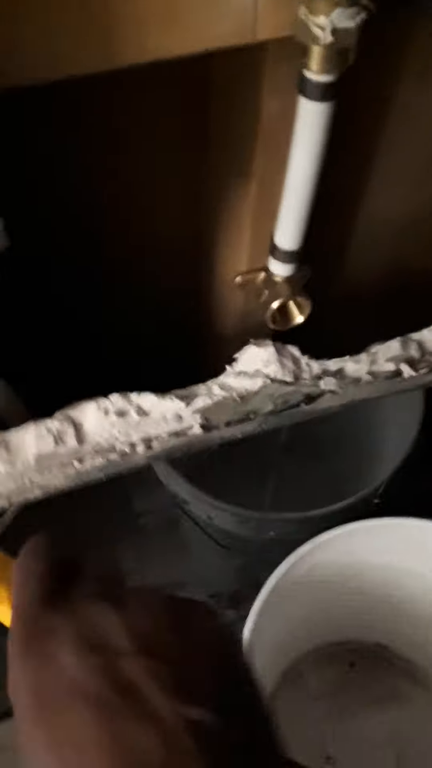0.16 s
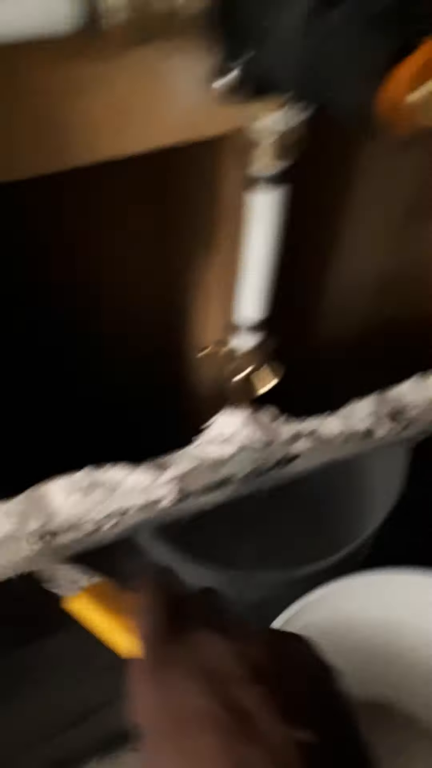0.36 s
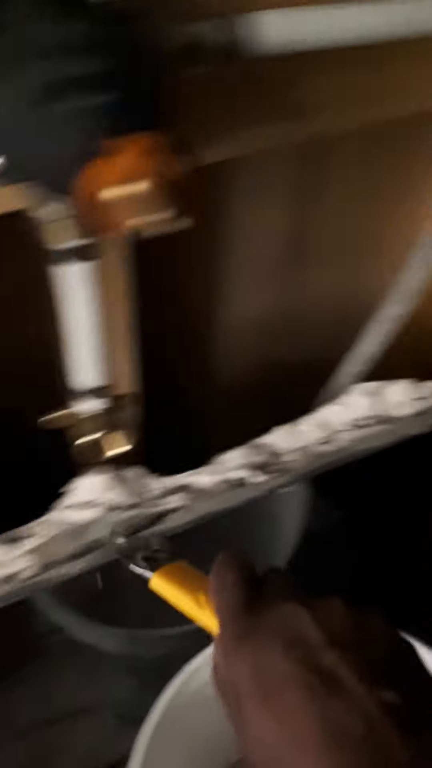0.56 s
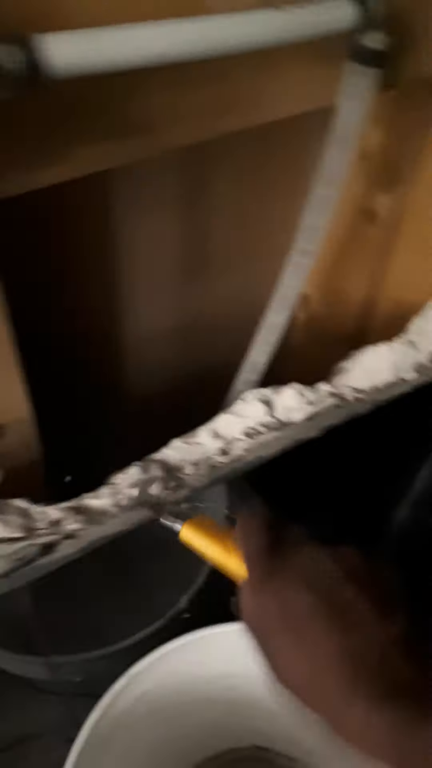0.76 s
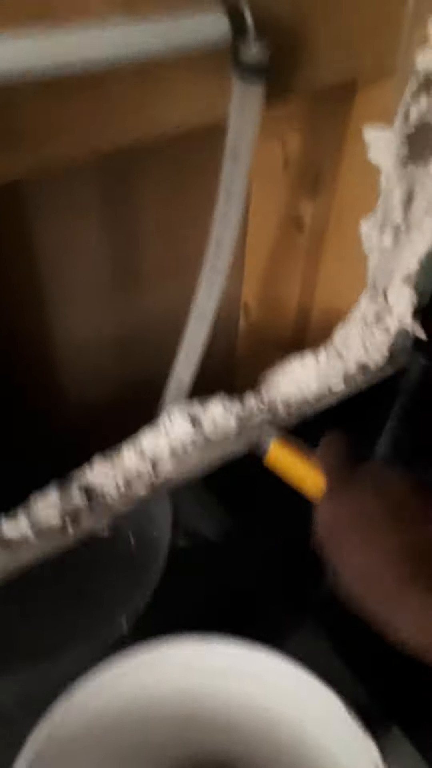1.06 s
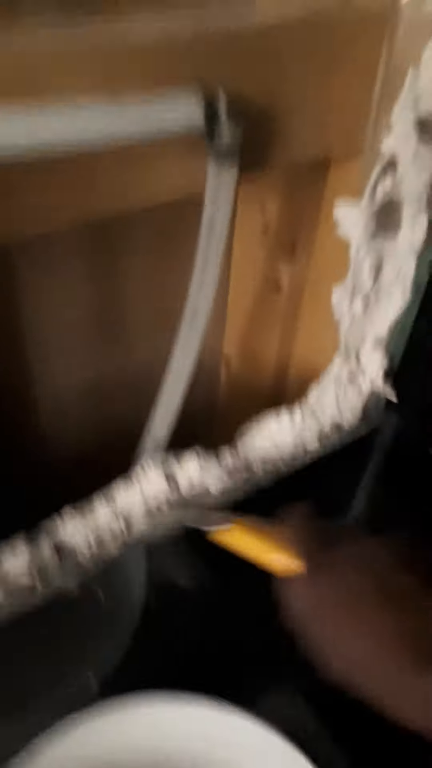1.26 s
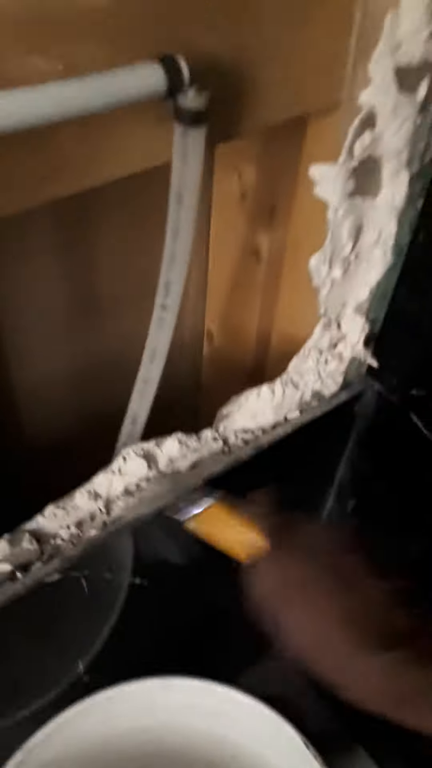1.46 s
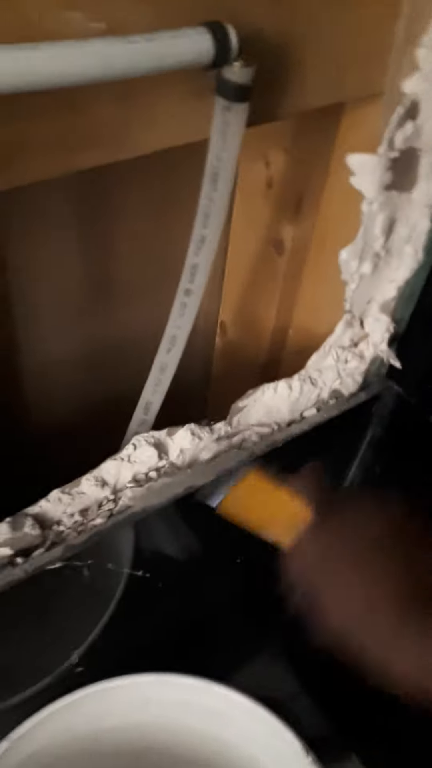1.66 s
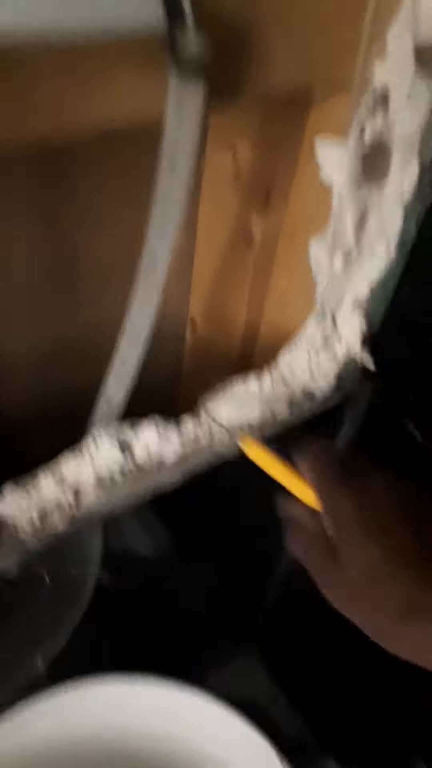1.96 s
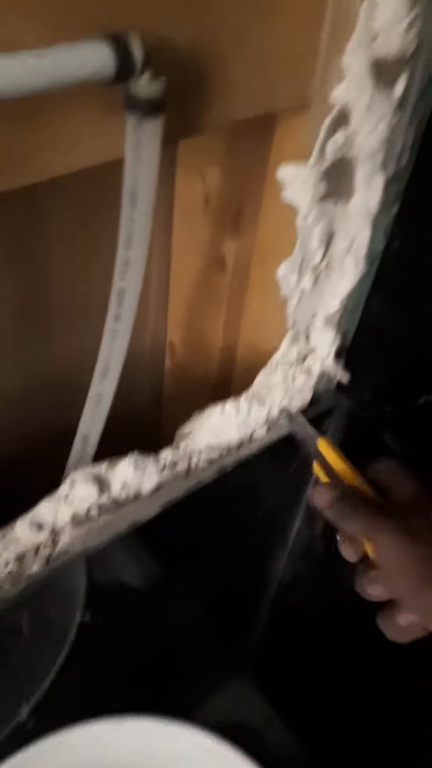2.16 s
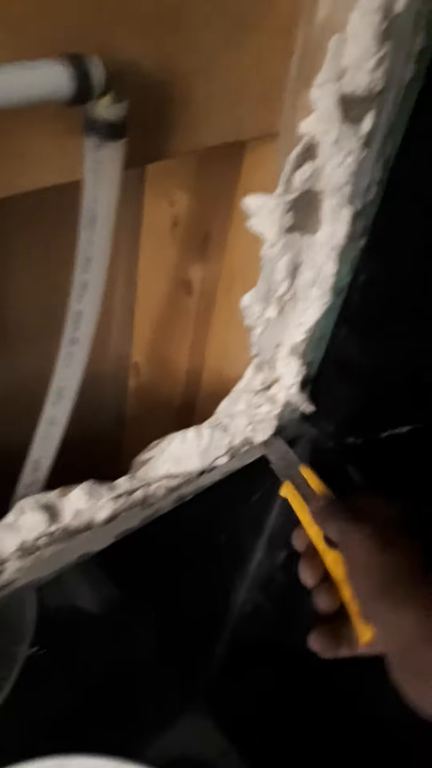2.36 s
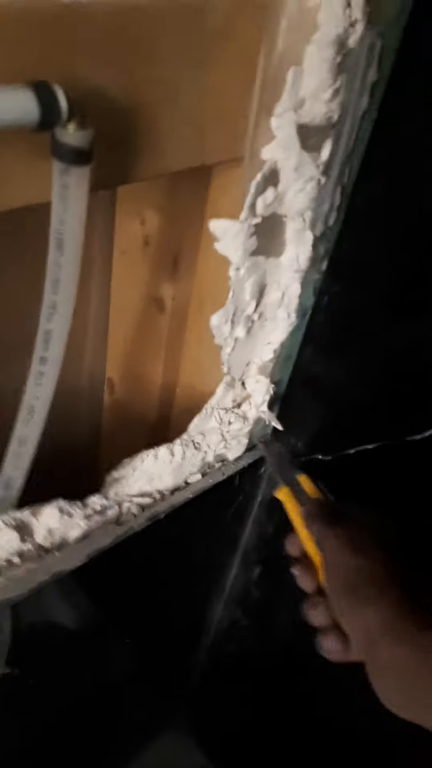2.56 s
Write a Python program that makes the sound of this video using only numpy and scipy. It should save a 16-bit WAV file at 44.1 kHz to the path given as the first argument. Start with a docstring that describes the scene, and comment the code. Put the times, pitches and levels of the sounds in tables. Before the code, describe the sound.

A knife blade scrapes crumbly mortar off a hollow wall edge in quick, gritty, uneven strokes.

```python
"""A utility knife scrapes crumbly mortar off the edge of a tiled wall opening, in a small hard room. The scene
opens on the faint, fading end of a stroke; then come a long stroke, a short jab and a dropping chip, then a
deep and a light stroke. Last, the blade chatters, brushes the edge and works at a corner, where a second,
softer chip drops. One stream of random clicks drives the rasp, the fizz of sand, the crunch and the drumming of
the hollow wall. Extra filtered clicks and bursts make landings, snags and crumbs; wavering tones make the
squeaks and groans."""
import sys
import numpy as np
from scipy import signal
from scipy.fft import rfft, irfft
from scipy.io import wavfile
from scipy.ndimage import uniform_filter1d

SR = 44100
rng = np.random.default_rng(int(sys.argv[2]) if len(sys.argv) > 2 else 0)


def materialize(psi):
    """Save the field psi as 16-bit PCM at rate SR to the path in sys.argv[1].

    A 1-D psi becomes a single channel; in a 2-D psi each row is a channel.
    """
    bounded = np.clip(np.atleast_2d(psi).T, -1, 1)
    quanta = np.round(bounded * 32767).astype(np.int16)
    wavfile.write(sys.argv[1], SR, quanta)


N = 119070
TIME_S = np.arange(N) / SR

# Tone of the drumming wall. Each row: frequency in Hz, relative level in dB.
DRUM_TONE = [(25, -55), (55, -16.5), (75, -9.5), (98, -3), (128, 5), (163, -13), (185, -9), (220, -9.5),
             (280, -16), (600, -56)]
# Tone of a breaking grain or crumb. Each row: frequency in Hz, relative level in dB.
GRAIN_TONE = [(200, -12), (700, -5.5), (1800, 1.5), (4000, 0.5), (5000, -4), (7500, -1.5), (9000, -18.5),
              (11000, -9.5), (15500, -0.5)]

HIT_WET_DB, DEBRIS_WET_DB = -2, -12.5  # how strongly contacts and debris feed the room


def amp(db):
    """Turns decibels into a gain."""
    return 10 ** (np.asarray(db) / 20)


def unit(x):
    """Scales a signal to an rms level of 1."""
    return x / np.sqrt(np.mean(x ** 2) + 1e-20)


def read(points, hz):
    """Reads a table of frequencies and values, with straight lines between points on a log-frequency axis."""
    table_hz, value = np.transpose(points)
    return np.interp(np.log(hz + 1), np.log(table_hz + 1), value)


def convolve(x, response):
    """Lets every sample of x set off the response, and keeps the length of the scene."""
    return signal.fftconvolve(np.atleast_2d(x), np.atleast_2d(response), axes=1)[:, :N]


def colour(x, points, size=4096):
    """Gives x the tone in the table, with a filter of unit energy that responds only after its input."""
    hz = abs(np.fft.fftfreq(size, 1 / SR))
    log_gain = np.log(amp(read(points, hz)))
    # The Hilbert transform supplies the phase that puts the response as early as possible
    spectrum = np.exp(np.conj(signal.hilbert(log_gain)))
    response = np.fft.ifft(spectrum).real[:size // 2]
    return convolve(x, response / np.linalg.norm(response))[0]


def high_pass(x, hz, order=2):
    """Weakens what lies under hz."""
    return signal.sosfilt(signal.butter(order, hz, "high", fs=SR, output="sos"), x)


def impulses(rows):
    """Makes one click for each pair of time in seconds and level in dB."""
    return sum(amp(db) * (np.arange(N) == round(start * SR)) for start, db in rows)


def gate(start, end):
    """Opens during a contact: a quick rise, a hold and a short release."""
    rise_s, release_s = 0.0007, 0.0019
    rise = np.clip((TIME_S - start) / rise_s, 0, 1)
    return rise * np.exp(-np.maximum(TIME_S - end, 0) / release_s)


def burst(start, length, db):
    """Shapes a brief contact that weakens as it lasts."""
    sag_db = -5.5  # change over one length
    progress = np.clip((TIME_S - start) / length, 0, 2)
    return gate(start, start + length) * amp(db + sag_db * progress)


def send(x, wet_db):
    """Pairs a sound with its feed to the room."""
    return np.array([x, x * amp(wet_db)])


def ringing(x, modes):
    """Lets x strike a body whose resonances each fade at their own pace."""
    t = TIME_S[:SR // 2]
    response = sum(amp(db - 60 * t / t60) * np.cos(2 * np.pi * hz * t) for hz, db, t60 in modes)
    return convolve(x, response)[0]


def wall(x):
    """Adds the ring of the hollow wall to the sound that drives it."""
    # Resonances of the wall. Each row: frequency in Hz, relative level in dB, seconds to fade by 60 dB.
    wall_modes = [(129.4, -5, 0.069), (181, -1, 0.36), (219, -6, 0.15), (330, -0.5, 0.3), (442, 4, 0.18),
                  (611, 4.5, 0.19), (653, -11.5, .16)]
    ring_gain = amp(-51) / 2
    return x + ring_gain * ringing(x, wall_modes)


def background_air():
    """Makes a faint steady hiss and hum of the air from filtered noise, separate for left and right."""
    # Tone of the air. Each row: frequency in Hz, relative level in dB.
    air_tone = [(25, 1), (60, 8.5), (130, 6), (300, -10), (1200, -19.5), (2100, -1), (3000, -21.5),
                (7000, -17), (10000, -22.5), (16000, -14)]
    level_db = -63
    return amp(level_db) * np.array([colour(rng.standard_normal(N), air_tone) for _ in range(2)])


def room(x, size=256):
    """Adds close reflections from the tiles to dry sound x[0], and a fading tail of the room to feed x[1]."""
    # Fading of the tail. Each row: frequency in Hz, seconds to fade by 60 dB.
    fade_times = [(100, 0.16), (260, 0.43), (700, 0.28), (1600, 0.34), (2150, 0.38), (2800, 0.27),
                  (4850, 0.3), (12800, 0.22)]
    # Likeness of the two sides. Each row: frequency in Hz, left-right likeness (1 is identical).
    likeness = [(100, 0.67), (300, 0.71), (700, 0.83), (1500, 0), (15000, 0)]
    early_db, early_s = 5.5, 0.0029
    early_low_hz = 990  # the nearby surfaces reflect mainly above this

    # The tail is noise, partly shared by both sides, that fades at a pace set by frequency
    hz, t, z = signal.stft(rng.standard_normal((2, SR // 2)), SR, nperseg=size)
    same = np.clip(read(likeness, hz), -1, 1)[:, None]
    z = np.array([z[0], same * z[0] + np.sqrt(1 - same ** 2) * z[1]])
    fade = amp(-60 * t / read(fade_times, hz)[:, None])
    tail = signal.istft(z * fade, SR, nperseg=size)[1]
    t = np.arange(tail.shape[1]) / SR
    tail = tail * np.clip(t / early_s - 1, 0, 1)  # it starts after the close reflections

    early = high_pass(rng.standard_normal(tail.shape) * np.exp(-t / early_s), early_low_hz)
    close = amp(early_db) * convolve(x[0], early / np.linalg.norm(early[0]))
    return close + convolve(x[1], tail / np.linalg.norm(tail[0]))


def moving_room(x, count=6):
    """Blends through a loop of random room responses, as the hand and the microphones move."""
    shift_s = 0.06  # time from one response to the next
    # Distance in time from each response's turn, wrapped around the loop
    apart = (TIME_S / shift_s - np.arange(count)[:, None] + count / 2) % count - count / 2
    shares = np.cos(np.pi / 2 * np.minimum(abs(apart), 1))
    return sum(room(x * share) for share in shares)


def debris():
    """Filters clicks into sharp cracks of single crumbs and dull ticks of falling chips."""
    # Single crumbs crack off. Each row: start in seconds, click level in dB.
    crumb_cracks = [(0.219, -22), (0.357, -7), (0.617, -4), (1.198, -29.5), (2.012, -34.5), (2.231, -27),
                    (2.267, -28), (2.305, -39), (2.53, -24)]
    # Loose chips drop. Each row: start in seconds, click level in dB.
    chip_drops = [(1.1972, -12.5), (2.412, -23.5)]
    # Tone of a dropping chip. Each row: frequency in Hz, relative level in dB.
    chip_tone = [(60, -12), (200, 26), (700, 19), (1300, 0.5), (3000, -10.5), (7000, -14), (9000, -24),
                 (15500, -9.5)]
    return colour(impulses(crumb_cracks), GRAIN_TONE) + colour(impulses(chip_drops), chip_tone)


def squeaks():
    """Slips briefly fall in with one resonance of blade or wall: a wavering tone that slides as the edge moves."""
    # Squeaks and groans. Each row: start in seconds, length in seconds, middle pitch in Hz,
    # width of the wavering in Hz, peak level in dB.
    squeak_events = [(0.191, 0.31, 339.4, 108, -35), (0.273, 0.062, 3703, 400, -31.5),
                     (0.59, 0.036, 700, 70.6, -17.5), (0.675, 0.02, 3830, 213, -29),
                     (0.761, 0.12, 622.6, 25, -33), (1.012, 0.037, 1239, 200, -26.5),
                     (1.007, 0.031, 3600, 186, -26), (1.351, 0.016, 1850, 313, -32.5),
                     (1.367, 0.041, 2950, 250, -30.5), (1.482, 0.029, 1282, 263, -19.5),
                     (1.547, 0.025, 1275, 219, -24), (1.778, 0.055, 7590, 617, -29),
                     (1.748, 0.099, 5850, 708, -33), (1.79, 0.038, 2446, 236.5, -28.5),
                     (1.818, 0.044, 342.8, 57, -31.5), (2.415, 0.032, 2433, 395.4, -33),
                     (2.439, 0.035, 1248, 412, -31.5)]
    glide = -0.046  # share by which the pitch slides from start to end
    out = np.zeros(N)
    for start, length, hz, width, db in squeak_events:
        progress = np.clip((TIME_S - start) / length, 0, 1)
        # Small random steps add up, so the phase strays
        jitter = np.sqrt(2 * np.pi * abs(width) / SR) * np.cumsum(rng.standard_normal(N))
        turns = np.cumsum(hz * (1 + glide * (progress - 0.5))) / SR
        swell = np.sin(np.pi * progress)
        out += amp(db) * swell * np.sin(2 * np.pi * turns + jitter)
    return out


def slip_band():
    """Spreads the slip rates around the usual one."""
    scale_hz = 205  # the spread peaks a little below this, near 163 Hz
    ratio = np.fft.rfftfreq(N, 1 / SR) / scale_hz
    return ratio / (1 + ratio ** 3)


def grains():
    """The edge breaks grain after grain, clumped by sticking and slipping; the hand keeps the mean force even."""
    grains_per_s, spread_db, slip_db = 5000, 2, 3
    happens = rng.random(N) < grains_per_s / SR
    direction = rng.choice([-1., 1.], N)
    size = amp(spread_db * np.minimum(rng.exponential(1, N), 4))
    slips = unit(irfft(rfft(rng.standard_normal(N)) * slip_band(), N))
    force = happens * direction * size * amp(slip_db * slips)
    return force / np.sqrt(uniform_filter1d(force ** 2, size=700) + 1e-6)  # evened over about 16 ms


def snags():
    """Hard grains crack under the edge in short bursts of clicks."""
    # The edge snags on a hard grain. Each row: start in seconds, length in seconds, starting level in dB.
    snag_events = [(0.306, 0.014, -30), (0.337, 0.038, -27), (0.455, 0.024, -27), (0.556, 0.0095, -25.5),
                   (0.6, 0.03, -29), (0.67, 0.009, -23), (0.711, 0.057, -24.5), (1.003, 0.0093, -32.5),
                   (1.4, 0.0083, -23), (1.444, 0.043, -22), (1.754, 0.012, -27.5), (1.821, 0.0017, -32),
                   (2.386, 0.002, -30.5), (2.417, 0.002, -31), (2.4425, 0.0034, -18.5)]
    return colour(grains() * sum(burst(*row) for row in snag_events), GRAIN_TONE)


def landings():
    """The blade ticks on the tile edge, chatters, rings and thuds the wall."""
    # The blade lands. Each row: start in seconds, length in seconds, starting level of the chatter in dB,
    # starting level of the thud in the wall in dB, level of the click that rings the knife in dB.
    landing_events = [(0.2007, 0.0066, -27, -49, -53), (1.3565, 0.0015, -28, -49, -29),
                      (1.6982, 0.0065, -29.5, -38, -38), (1.897, 0.0082, -32, -52, -42),
                      (2.1353, 0.013, -24.5, -56.5, -28.5), (2.1483, 0.013, -29, -63, -25.5),
                      (2.363, 0.0026, -30, -62, -48)]
    # Tone of the blade on the tile. Each row: frequency in Hz, relative level in dB.
    blade_tone = [(200, -13), (450, -31), (750, -6.5), (1150, -22), (1800, 2), (2200, 1.5), (3000, 4.5),
                  (4000, 1), (5000, -1.5), (6700, 0.5), (7800, -8), (9000, -17), (11500, -9.5),
                  (15500, -9.5)]
    # Ring of the knife. Each row: frequency in Hz, relative level in dB, seconds to fade by 60 dB.
    knife_modes = [(2130, -8, .12), (2200, -3.5, .06), (3530, -23.5, .2), (3740, -13.5, 0.11),
                   (5795, -22, .15)]
    tick_db = 14  # the first touch, above the chatter that follows

    tick = impulses((start, db + tick_db) for start, _, db, _, _ in landing_events)
    chatter = sum(burst(start, length, db) for start, length, db, _, _ in landing_events)
    thud = sum(burst(start, length, db) for start, length, _, db, _ in landing_events)
    blade = colour(tick + chatter * grains(), blade_tone)
    knife = ringing(impulses((start, db) for start, _, _, _, db in landing_events), knife_modes)
    return blade + knife + wall(colour(thud * grains(), DRUM_TONE))


def wander(x, size=512):
    """Shifts the tone in random patches, as the resonances of the contact change along the edge."""
    patchy_db = 2.0
    z = signal.stft(x, nperseg=size)[2]
    noise = rng.standard_normal(z.T.shape)
    smooth_in_time = uniform_filter1d(noise, size=5, axis=0)
    patches = unit(uniform_filter1d(smooth_in_time, size=4, axis=1)).T
    return signal.istft(z * unit(amp(patchy_db * patches)), nperseg=size)[1][:N]


def grit(rasp_level):
    """Now and then a coarse grain bursts under the pressed blade, as a click sized against the rasp."""
    grit_per_s, smallest_db, spread_db = 65, 10, 4.5
    happens = rng.random(N) < grit_per_s / SR
    size = amp(smallest_db + spread_db * np.minimum(rng.exponential(1, N), 3))
    return colour(rasp_level * happens * size, GRAIN_TONE)


def scraping():
    """One stream of breaking grains drives the blade, the sand, the crumbs and the wall."""
    # One table per stroke. Each row: time in seconds, then the levels in dB, before the layer trims below,
    # of the rasp of the blade, the fizz of the sand, the crunch of the mortar and the drumming of the wall.
    opening_fade = [(0, -41, -54.5, -44, -36.5), (.05, -52, -60, -57.5, -50)]
    long_stroke = [(0.204, -38, -50, -33.5, -33), (0.223, -43, -61, -44.5, -30),
                   (0.251, -41, -50.5, -48.5, -38.5), (0.313, -31.5, -38.5, -32, -44),
                   (0.327, -34, -37, -38.5, -35), (0.356, -31.5, -49.5, -26, -24),
                   (0.395, -28.5, -33, -30.5, -45.5), (0.469, -31, -32, -31, -29),
                   (0.498, -36, -54, -30.5, -32), (0.511, -26.5, -34.5, -28, -38),
                   (0.537, -31.5, -45, -30.5, -30.5), (0.57, -23.5, -34, -26.5, -32.5),
                   (0.589, -27.5, -37, -28.5, -25.5), (0.6, -20, -24.5, -22, -48),
                   (0.624, -20.5, -29, -17, -31.5), (0.662, -29, -44.5, -45.5, -39),
                   (0.678, -22.5, -24.5, -28.5, -25.5), (0.692, -29.5, -38.5, -27.5, -31),
                   (0.735, -23, -25.5, -29.5, -35.5), (0.795, -27, -42.5, -22.5, -31.5),
                   (0.861, -34.5, -36.5, -34.5, -40.5), (0.88, -22, -35, -27, -24),
                   (0.909, -41, -49, -28.5, -32), (0.967, -61, -78.5, -62, -37.5)]
    jab = [(0.995, -29.5, -38.5, -20.5, -49.5), (1.009, -18, -24.5, -30.5, -44),
           (1.025, -21.5, -27, -19.5, -22.5), (1.041, -23, -30, -24.5, -34.5),
           (1.075, -32, -46, -42, -35.5), (1.125, -60.5, -75, -48.5, -40), (1.185, -49, -60, -42.5, -45),
           (1.2, -43.5, -65, -64, -52)]
    deep_stroke = [(1.359, -40, -43, -60, -56), (1.369, -32.5, -41, -47, -37.5),
                   (1.409, -27.5, -31, -26.5, -48), (1.424, -38.5, -46, -34, -33),
                   (1.445, -20.5, -28, -24.5, -29), (1.466, -26, -28, -26, -46),
                   (1.474, -21, -27, -25, -33), (1.496, -24, -38.5, -16.5, -30),
                   (1.53, -37, -43.5, -31, -29), (1.551, -25, -33.5, -26.5, -25.5),
                   (1.576, -28, -50, -30.5, -27), (1.62, -56, -67, -51, -55)]
    light_stroke = [(1.703, -24, -68, -38.5, -33), (1.723, -40.5, -52, -38, -40),
                    (1.757, -32.5, -30, -38, -36), (1.817, -39, -27.5, -48.5, -59),
                    (1.832, -25, -30, -24, -26), (1.855, -46, -47, -38, -63), (1.879, -47, -63, -49, -51),
                    (1.902, -24, -30, -49, -63), (1.916, -45, -57.5, -66, -35)]
    # The blade brushes the edge and the hand bumps the wall. Same columns.
    brush = [(2.168, -44, -57, -49.5, -59), (2.265, -56, -72, -65, -55), (2.294, -74, -79, -64, -42),
             (2.35, -65, -77, -69, -77)]
    corner_stroke = [(2.353, -29.5, -47, -61, -60), (2.374, -37, -57, -65, -47),
                     (2.386, -36.5, -34, -52, -46), (2.41, -33.5, -47, -66, -58),
                     (2.427, -30, -39, -59, -59), (2.439, -42, -52, -57, -69), (2.447, -30, -45, -64, -70),
                     (2.48, -57, -67, -44.5, -76), (2.536, -42, -52, -41.5, -57),
                     (2.58, -41, -48, -40.5, -45), (2.604, -44, -50, -31.5, -39),
                     (2.638, -69, -63, -80, -58), (2.648, -34.5, -45, -34.5, -59),
                     (2.663, -46, -50, -37.5, -55), (2.7, -30, -37, -45, -55)]
    # Tones of the blade, the sand and the mortar. Each row: frequency in Hz, relative level in dB.
    rasp_tone = [(900, -34.5), (1600, -8.5), (2100, 6.5), (2700, 1.5), (3200, -2.5), (3750, -1.5),
                 (4600, -7.5), (6000, -6), (7600, -7), (8300, -25.5), (9300, -15), (14000, -45.5)]
    fizz_tone = [(5000, -52.5), (8000, -3), (9200, -9), (10800, -0.5), (13000, -3.5), (15200, -0.5),
                 (15800, 4.5), (16500, -28.5)]
    crunch_tone = [(150, -49), (280, -8.5), (335, -2), (390, -1.5), (520, 0), (640, 2.5), (800, 3),
                   (1030, -1.5), (1260, 7), (1480, -2), (1700, -2), (2300, -16), (5000, -33.5)]
    # Trims of rasp, fizz, crunch and drumming in dB, then how strongly each feeds the room in dB.
    layer_db = [-5.5, -6.5, -6, -4]
    layer_wet_db = [-1.5, -1, -1.5, -6.5]

    drive = wander(grains())
    levels = 0
    for rows in (opening_fade, long_stroke, jab, deep_stroke, light_stroke, brush, corner_stroke):
        stroke = np.array(rows)
        times = stroke[:, 0]
        curves_db = [np.interp(TIME_S, times, column) for column in stroke.T[1:]]
        levels = levels + gate(times[0], times[-1]) * amp(curves_db)

    rasp = colour(levels[0] * drive, rasp_tone)
    fizz = colour(levels[1] * drive, fizz_tone)
    crunch = wall(colour(levels[2] * drive, crunch_tone))
    drumming = wall(colour(levels[3] * drive, DRUM_TONE))
    layers = rasp, fizz, crunch, drumming
    scrape = sum(send(amp(db) * x, wet_db) for x, db, wet_db in zip(layers, layer_db, layer_wet_db))
    return scrape + send(grit(levels[0]), DEBRIS_WET_DB)


def scene():
    """Brings everything to a close pair of microphones, directly and through the room."""
    # Balance of the sides by pitch. Each row: frequency in Hz, left minus right in dB.
    balance = [(100, -1.5), (300, 0.5), (600, 0), (1200, -5), (2400, -5.5), (4500, -2), (8500, 2.5),
               (15000, -3.5)]
    # Further balance of the sides over time. Each row: time in seconds, left minus right in dB.
    drift = [(0, 2.5), (.8, 2.5), (1.5, 3), (1.8, 3.5), (2.2, 3), (2.7, 2)]
    lead_s = 0.00016  # the direct sound reaches the nearer, left microphone first by this much

    contacts = landings() + snags() + squeaks()
    sound = scraping() + send(contacts, HIT_WET_DB) + send(debris(), DEBRIS_WET_DB)
    hz = np.fft.rfftfreq(N, 1 / SR)
    side = np.array([[0.5], [-0.5]])  # left, right
    direct = rfft(sound[0]) * np.exp(2j * np.pi * side * hz * lead_s)
    reflected = rfft(moving_room(sound))
    both = irfft((direct + reflected) * amp(side * read(balance, hz)), N)
    drift_db = np.interp(TIME_S, *np.transpose(drift))
    return both * amp(side * drift_db) + background_air()


def record(dry):
    """Limits the sound to the band between a low and a high cutoff."""
    low_cut_hz, high_cut_hz = 46, 15750
    low_pass = signal.firwin(511, high_cut_hz, window=("kaiser", 9), fs=SR)
    return signal.oaconvolve(high_pass(dry, low_cut_hz), low_pass[None], "same")


dry = scene()
out = record(dry)
materialize(out)
```